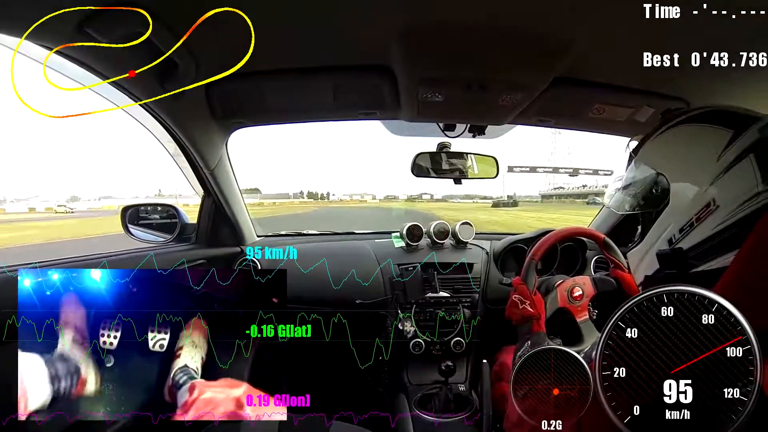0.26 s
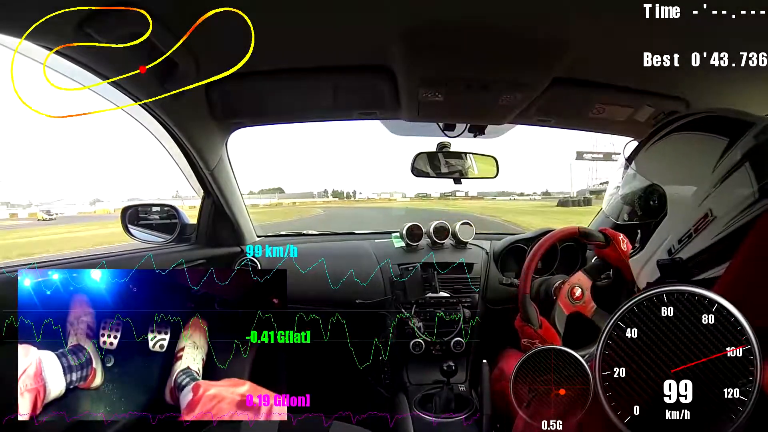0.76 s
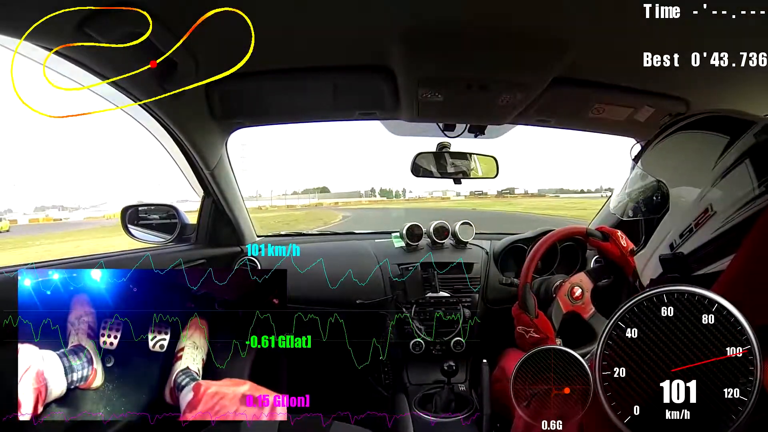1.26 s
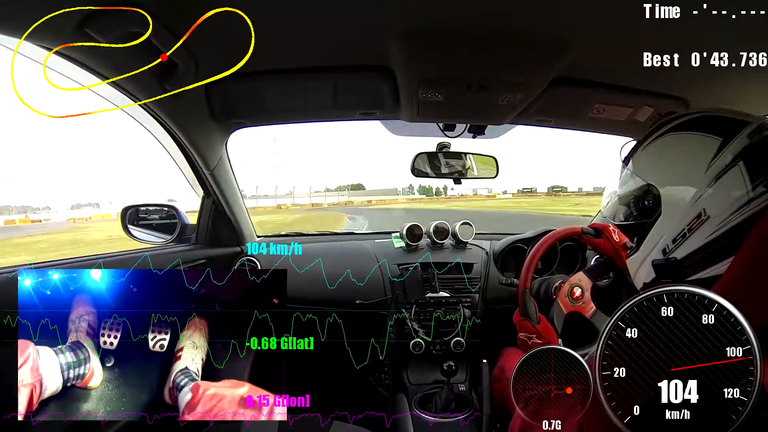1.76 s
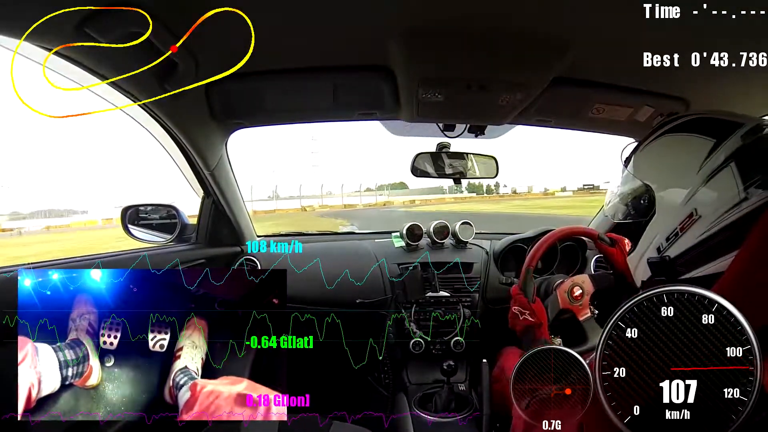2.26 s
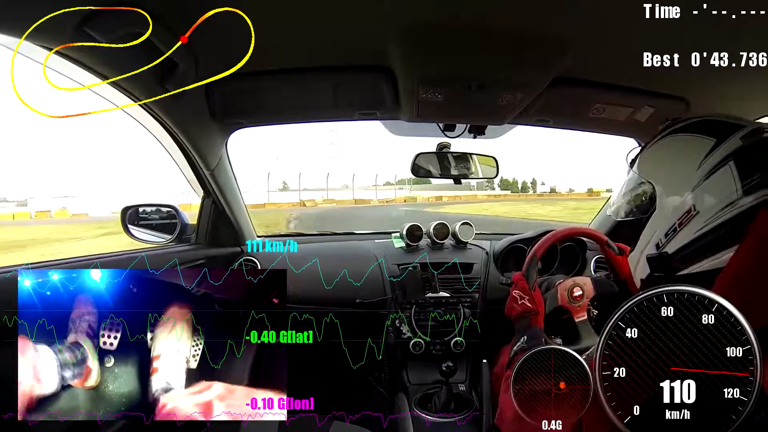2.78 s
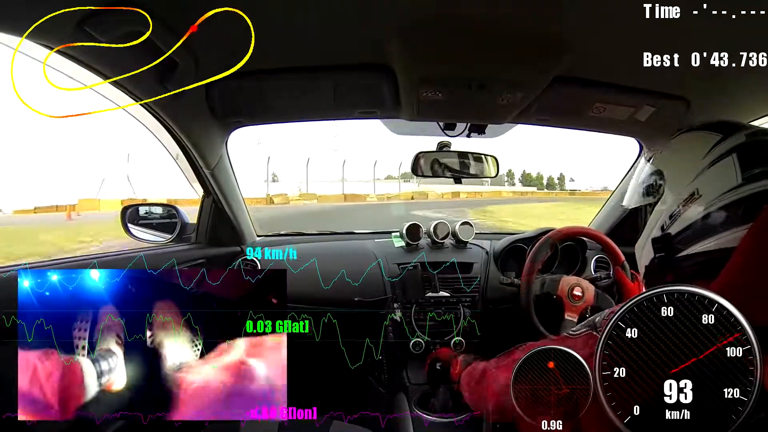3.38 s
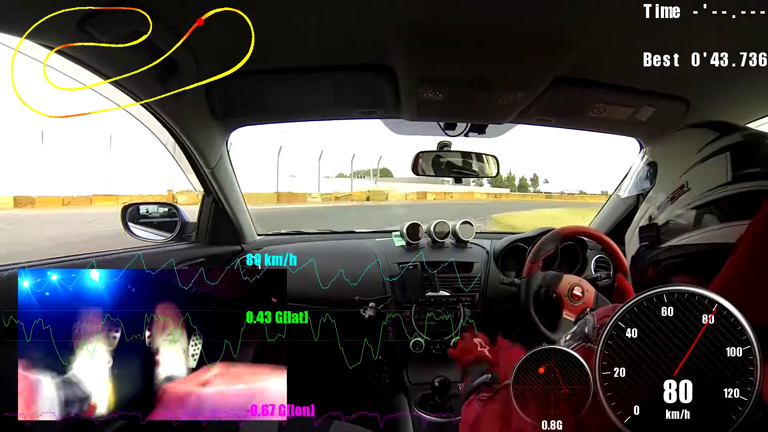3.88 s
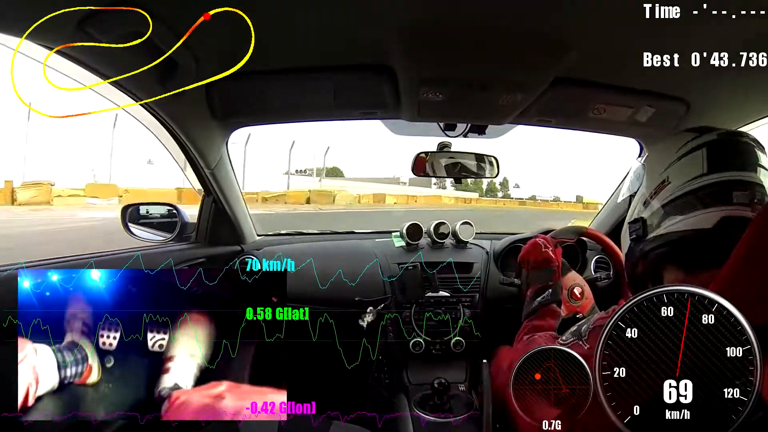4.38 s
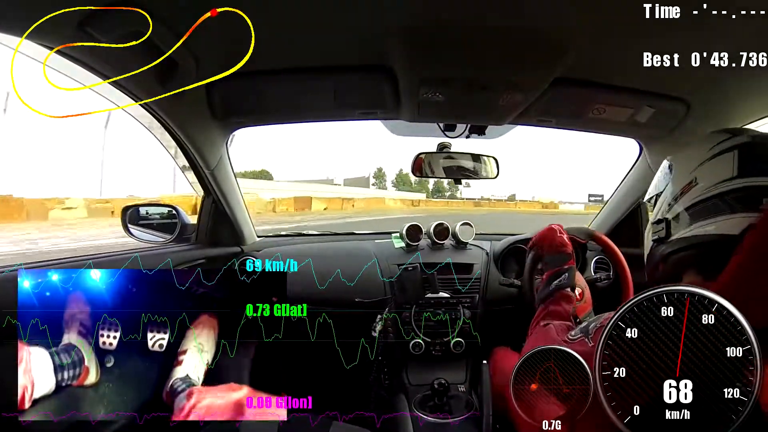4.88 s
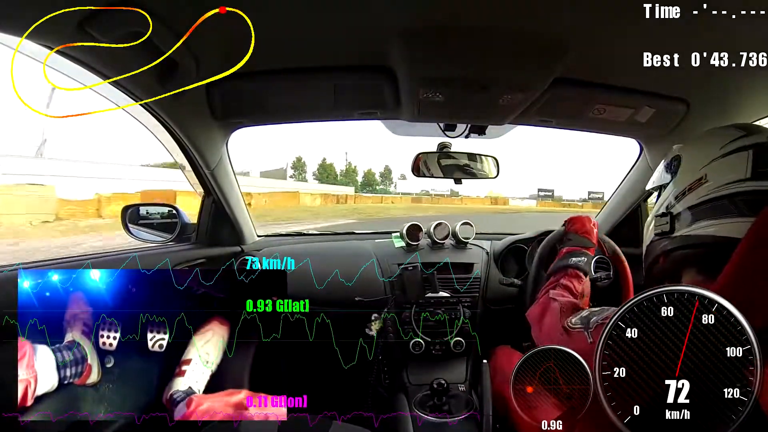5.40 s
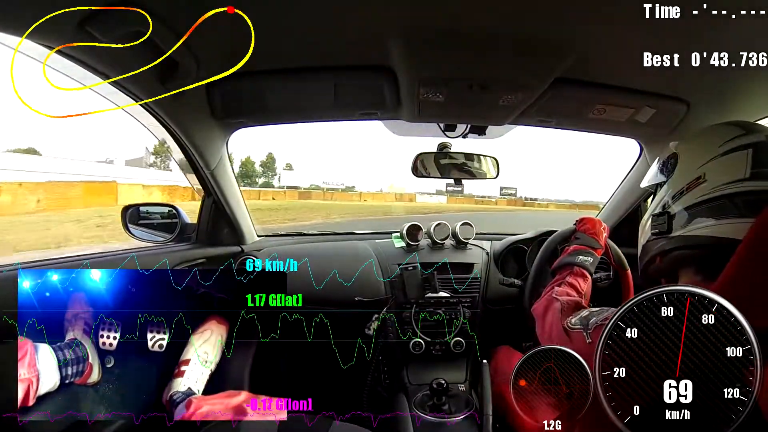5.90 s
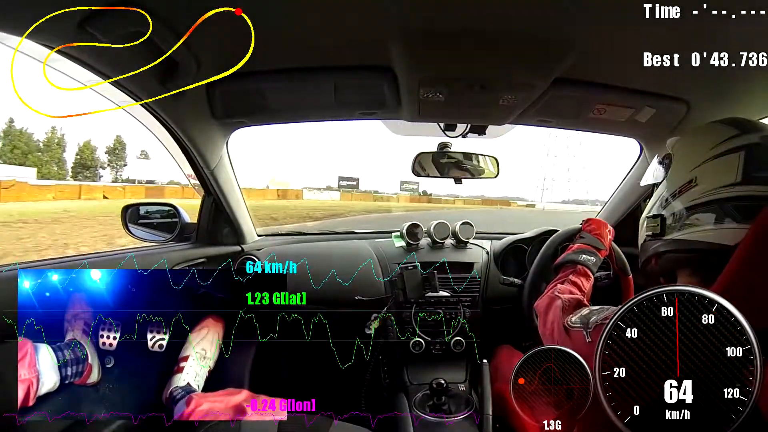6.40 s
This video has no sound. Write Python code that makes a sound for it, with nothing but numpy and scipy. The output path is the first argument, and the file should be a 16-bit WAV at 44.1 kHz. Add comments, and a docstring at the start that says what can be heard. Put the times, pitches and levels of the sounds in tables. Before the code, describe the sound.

Heard from inside a sports car on a race circuit, the engine drops in pitch on an upshift, then pulls with a slowly rising drone over deep road rumble and throbbing air. The throttle lifts, the tyres chirp under braking, and the engine blips for a downshift as the gear lever clacks with a thump. The tyres then squeal through a tight corner. The small microphone crackles faintly and distorts slightly.

```python
"""A rotary engine heard from inside a car on a circuit: an upshift, a pull, braking with a blipped
downshift, then a tight corner. The exhaust drones on its firing orders, the cabin air throbs like a
blown bottle, the road rumbles and roars, and the treble crackles. Tyres stick and slip into chirps and
squeals, and the gear lever jangles its gate. The small microphone saturates on the biggest swings."""
import sys
import numpy as np
from scipy import signal
from scipy.fft import rfft, irfft, next_fast_len
from scipy.io import wavfile
from scipy.ndimage import uniform_filter1d, map_coordinates

SR = 44100
rng = np.random.default_rng(int(sys.argv[2]) if len(sys.argv) > 2 else 0)


def transcribe(signal):
    """Save signal, clipped to [-1, 1], as a 16-bit WAV file at the path in sys.argv[1]."""
    frames = np.atleast_2d(signal).T
    limited = np.clip(frames, -1, 1)
    pcm = np.round(limited * 32767).astype(np.int16)
    wavfile.write(sys.argv[1], SR, pcm)


N = 293265
TIME_S = np.arange(N) / SR


def amp(db):
    return 10 ** (np.asarray(db) / 20)


def unit(x):
    return x / np.sqrt(np.mean(x ** 2) + 1e-20)


def along(points, hz):
    """Read an EQ curve at hz, on a log frequency axis."""
    freq_hz, gain_db = np.transpose(points)
    return np.interp(np.log(hz + 1), np.log(freq_hz + 1), gain_db)


def curves(rows):
    """One automation curve for each column after the time."""
    time_s, *columns = np.transpose(rows)
    return [np.interp(TIME_S, time_s, column) for column in columns]


def window(rows, fade_s=0.016):
    """A gate open while the table runs, fading except at the edges of the scene."""
    start = (TIME_S - rows[0][0]) / fade_s + (rows[0][0] <= 0)
    end = (rows[-1][0] - TIME_S) / fade_s + (rows[-1][0] > N / SR - .1)
    return np.clip(np.minimum(start, end), 0, 1)


def wobble(rate_hz, step=16):
    """Smooth random modulation."""
    at = np.arange(0, N + step, step)
    knots = rng.standard_normal(int(N * rate_hz / SR) + 4)
    return np.interp(np.arange(N), at, map_coordinates(knots, [at * rate_hz / SR]))


def filtered(x, response):
    size = next_fast_len(N + SR // 2)
    return irfft(rfft(x, size) * response(np.fft.rfftfreq(size, 1 / SR)), size)[..., :N]


def noise(colour):
    """Coloured noise of rms 1."""
    return unit(filtered(rng.standard_normal(N), lambda hz: amp(along(colour, hz))))


def turns(hz):
    """Running phase of a pitch curve, in radians."""
    return 2 * np.pi * np.cumsum(hz) / SR


def evened(x, share):
    """Even out the swings of a noise, as in damped or self-limiting motion."""
    envelope = np.abs(signal.hilbert(x, next_fast_len(N))[:N])
    return unit(x / (envelope + 0.38) ** share)


def strikes(rows):
    """One spike for each row of start_s, level_db."""
    start_s, level_db = np.transpose(rows)
    return np.bincount(np.round(start_s * SR).astype(int), amp(level_db), N)


def puffs(spikes, colour, t60_s, rise_s):
    """Each spike becomes a short puff of noise."""
    t = np.arange(SR // 20) / SR
    shape = amp(-60 * t / t60_s) * (1 - np.exp(-t / rise_s))
    envelope = signal.fftconvolve(spikes, shape)[:N]
    return filtered(envelope * rng.standard_normal(N), lambda hz: amp(along(colour, hz)))


# slow fader ride: time_s, gain_db
SWELLS = [(0, -1.5), (.3, -0.5), (.55, -3.5), (.7, 2.5), (1.3, 2.5), (1.36, -3.5), (1.6, -2), (1.78, -4.5),
          (1.9, 2.5), (2.14, 2), (2.2, -1), (2.5, -1.5), (2.72, 1), (3.1, 5), (3.55, 1), (3.78, 2.5),
          (4.0, -2), (4.2, -0.5), (4.6, -2), (5.0, 1), (5.35, 1), (5.7, 1.5), (6.0, -0.5), (6.65, 0)]
# sudden dips: start_s, depth_db (scaled by the dip's envelope)
DIPS = [(.3, -7.5), (2.26, -4), (2.549, -8.5), (3.12, -10), (3.204, -0.5), (3.236, -5), (3.27, -8),
        (3.409, -7), (4.01, 0), (4.231, -16)]


def bed_fader(fall_s=0.0062, recover_s=0.07):
    """Gain in dB shared by engine and road: slow swells and brief dips."""
    gain_db = curves(SWELLS)[0]
    for start_s, depth_db in DIPS:
        age = np.maximum(TIME_S - start_s, 0)
        gain_db += depth_db * (1 - np.exp(-age / fall_s)) * np.exp(-age / recover_s)
    return gain_db


# engine revs: time_s, firing_hz
REVS = [(0, 227), (.28, 164), (.45, 166), (.81, 170.4), (1.17, 174.4), (1.53, 177.5), (1.98, 181.8),
        (2.6, 187), (2.9, 188), (3.55, 122), (3.7, 157), (3.84, 192.5), (3.92, 193), (4.05, 188),
        (4.36, 164), (4.62, 173), (4.72, 183), (4.87, 172), (5.06, 181), (5.3, 180), (5.45, 173),
        (5.8, 165.5), (6.28, 154)]
# throttle: time_s, drone_db, overtone_bite_db
THROTTLE = [(0, -22.5, 3.5), (.09, -18.5, -13), (.3, -21.5, 6), (.7, -21, 3.5), (.93, -21.5, 1),
            (1.08, -22.5, -5.5), (1.27, -21, 1), (1.5, -20, 5), (2.0, -20, 2.5), (2.2, -19.5, 0.5),
            (2.3, -18, -4.5), (2.63, -20, -4), (2.68, -38.5, 7), (2.75, -29.5, -7), (2.82, -44.5, -7),
            (2.9, -50.5, 1), (3.55, -47, 1.5), (3.6, -29, 3.5), (3.72, -24.5, 7.5), (3.82, -16, -4.5),
            (3.925, -16, -1), (3.95, -35.5, 8.5), (4.0, -23, -7), (4.05, -51, 3), (4.36, -47, 3),
            (4.44, -23.5, 0), (4.6, -35.5, 3), (4.68, -13.5, -5.5), (4.76, -14, 1.5), (4.85, -21.5, 1.5),
            (4.95, -19.5, 0.5), (5.08, -16.5, 1), (5.26, -17, 2.5), (5.33, -32, 3.5), (5.42, -35.5, -7),
            (5.62, -27.5, 2.5), (6.1, -34, 6.5), (6.2, -24.5, 2), (6.28, -51, 1)]
# firing orders: firing_multiple, level_db, wander_db
ORDERS = [(.5, -16, 6.5), (1, 1.5, 0), (1.5, -30, 8), (2, -17.5, 0.5), (3, -19.5, 1), (4, -28, 2),
          (5, -32, 2)]
# resonances of exhaust and cabin: freq_hz, gain_db
PIPE_EQ = [(320, -1), (350, 3.5), (372, -0.5), (390, 9.5), (490, 2), (513, -5.5), (540, -2), (575, -3.5),
           (650, 1), (666, 7), (682, 12.5), (691, 12.5), (699, 5), (708, 3), (720, -2), (745, 6), (770, -6),
           (850, 3), (910, 2), (960, -3)]
# gas rasp: freq_hz, gain_db
RASP_EQ = [(250, -120), (350, -1), (500, 0.5), (700, 2), (950, -6.5), (1500, -16.5), (2500, -26),
           (4000, -120)]


def engine(fader_db, drift_rad=0.11, smear_rad=.05, rasp_db=-23):
    """Firing orders, uneven in size and timing, and a rasp of gas noise once per firing."""
    drone_db, bite_db = curves(THROTTLE)
    firing_hz = curves(REVS)[0]
    level_db = drone_db + fader_db
    phase = turns(firing_hz) + drift_rad * wobble(30)
    drone = np.zeros(N)
    for k, order_db, wander_db in ORDERS:
        tone_db = order_db + (k > 1) * bite_db + along(PIPE_EQ, k * firing_hz) + wander_db * wobble(7)
        smear = smear_rad * (k - 1) * wobble(70)
        drone += amp(level_db + tone_db) * np.sin(k * phase + smear + rng.uniform(0, 2 * np.pi))
    rasp = unit((1 + np.cos(phase)) ** 2 * noise(RASP_EQ))
    return np.sqrt(2) * drone + amp(level_db + rasp_db + bite_db / 2) * rasp


# road speed: time_s, speed_kmh
SPEED = [(0, 93), (2.75, 111), (3.0, 106), (3.75, 80), (4.5, 68), (5.5, 71), (6.65, 63)]
# sub-bass throb of the cabin air: time_s, level_db
THROB = [(0, -10.5), (.55, -10.5), (.9, -14.5), (1.13, -18.5), (1.3, -13), (1.39, -9.5), (1.75, -11),
         (1.83, -14), (2.0, -20), (2.2, -12.5), (2.43, -21), (2.85, -14.5), (3.3, -22), (3.7, -17.5),
         (3.95, -21), (4.18, -10.5), (4.3, -31.5), (4.62, -13), (4.78, -23), (4.98, -10), (5.12, -21),
         (5.9, -10.5), (6.1, -12.5), (6.5, -20.5), (6.65, -3.5)]
# its harmonics: pitch_multiple, level_db
THROB_HARMONICS = [(1, 0), (2, -19), (3, -19)]


def throb(hz_at_100_kmh=17.6, hz_per_kmh=0.075):
    """The cabin air bounces like a blown bottle, with an unsteady, peaked beat."""
    pitch_hz = hz_at_100_kmh + hz_per_kmh * (curves(SPEED)[0] - 100)
    phase = turns(pitch_hz) + 0.33 * wobble(2.926)
    beat = sum(amp(db + (k > 1) * 3.5 * wobble(7.2)) * np.cos(k * phase) for k, db in THROB_HARMONICS)
    return np.sqrt(2) * amp(curves(THROB)[0] + 2.05 * wobble(12)) * beat


# roughness under the wheels: time_s, rumble_db, boom_db, drumming_db
SURFACE = [(0, -17.5, -29.5, -31.5), (.45, -19.5, -28, -29.5), (.85, -27, -27, -31),
           (1.2, -16.5, -23.5, -30.5), (1.6, -17.5, -26.5, -28.5), (1.8, -23, -22.5, -29.5),
           (2.0, -20.5, -23, -30.5), (2.4, -15.5, -18, -31), (2.7, -17.5, -22, -32.5),
           (2.98, -19.5, -31.5, -32.5), (3.1, -13, -20.5, -32.5), (3.2, -16, -17.5, -31.5),
           (3.3, -16, -13.5, -26), (3.4, -11, -21.5, -32.5), (3.45, -21, -28, -31.5),
           (3.6, -22.5, -24, -28), (3.75, -17, -26.5, -29), (4.05, -19.5, -23.5, -28.5),
           (4.2, -13, -18.5, -28), (4.3, -13, -20, -30.5), (4.5, -17, -20.5, -27.5),
           (4.9, -19.5, -25, -28.5), (5.35, -22, -25.5, -30), (5.7, -16, -22.5, -27.5),
           (6.1, -20, -23.5, -29), (6.3, -14, -20.5, -28), (6.65, -16.5, -20.5, -24.5)]
# colours of the five road layers: freq_hz, gain_db
RUMBLE_EQ = [(13, -20), (22, 0.5), (31, -1), (65, -12.5), (84, -37), (140, -120)]
BOOM_EQ = [(32, -24), (55, 3), (70, -3.5), (91, 3.5), (150, -9), (200, -35.5), (330, -120)]
ROAR_EQ = [(300, -120), (500, -9), (682, 1.5), (780, -2), (870, -2.5), (1140, -7), (1660, -10),
           (2400, -17.5), (3090, -31), (4020, -37), (6800, -120)]
PANEL_EQ = [(70, -120), (120, -12), (150, 0), (280, -4.5), (375, -9), (520, -14), (640, -23.5),
            (1000, -120)]
WIND_EQ = [(1500, -30.5), (2500, -3), (3400, -4), (4700, -9.5), (6400, -12.5), (8000, -13.5), (9500, -20),
           (11200, -29), (12900, -39.5), (14400, -46.5), (16000, -120)]
# fader ride on wind and crackle: time_s, gain_db
TREBLE_RIDE = [(0, -0.5), (.55, -1.5), (.7, -0.5), (1.0, -2), (1.03, -3.5), (1.1, -2.5), (1.33, -1.5),
               (1.6, -0.5), (1.84, -1.5), (2.1, -1.5), (2.4, -0.5), (2.66, -0.5), (2.75, -1), (3.1, -1.5),
               (3.3, -0.5), (3.75, -0.5), (4.12, 2), (4.4, -0.5), (4.69, 0.5), (4.9, 1), (5.0, -1),
               (5.4, -1.5), (5.7, -2.5), (6.1, -3), (6.65, -2.5)]


def road(shake, fader_db):
    """Suspension rumble, floor boom, tyre roar, drumming panels, wind hiss and a fine crackle."""
    rumble_db, boom_db, drumming_db = curves(SURFACE)
    rumble = filtered(evened(noise(RUMBLE_EQ), share=.35), lambda hz: hz < 90)
    rumble *= amp(fader_db + rumble_db + 1.8 * wobble(14))
    boom = filtered(evened(noise(BOOM_EQ), share=.55), lambda hz: hz < 210)
    boom *= amp(fader_db + boom_db + 1.6 * wobble(16))
    power = (shake + rumble + boom) ** 2
    swing = power / np.abs(uniform_filter1d(power, size=SR // 4))  # against the local average

    unrest = amp(.45 * (curves(THROB)[0] + 13))  # the noise is smoother while the air throbs less
    flutter = unrest * 4 * np.tanh((wobble(22) + 2.0 * wobble(60)) / 3.2)
    lumps = unrest * wobble(12)
    speed_db = 20 * np.log10(curves(SPEED)[0] / 100)
    roar = amp(-38 + 0.17 * speed_db) * unit(amp(0.94 * flutter + 0.5 * lumps) * noise(ROAR_EQ))
    panels = amp(drumming_db) * unit(amp(0.31 * lumps + 0.23 * wobble(18)) * noise(PANEL_EQ))
    wind = unit(amp(0.86 * flutter + 0.21 * lumps + 0.17 * np.minimum(swing, 5.5)) * noise(WIND_EQ))
    treble_db = -55 + 1.26 * speed_db + curves(TREBLE_RIDE)[0]
    treble = amp(treble_db) * (wind + amp(-1.5) * crackle(swing))
    return rumble + boom + amp(fader_db) * (roar + panels + treble)


# colour of crackle, ticks and lever rasp: freq_hz, gain_db
TICK_EQ = [(700, -120), (1400, -3), (2500, 8), (4200, -3), (6500, -10), (8500, -17), (11000, -23),
           (14400, -50), (16000, -120)]


def crackle(swing):
    """Fine crackle that thickens on the biggest low swings."""
    rate_hz = 400 * np.minimum(swing, 2.0) ** 1.2
    spikes = (rng.random(N) < rate_hz / SR) * amp(rng.normal(0, 1.5, N))
    return unit(puffs(spikes, TICK_EQ, t60_s=0.014, rise_s=.006))


# thin high whistle: pitch_hz, level_db, end_s
WHISTLE = (7806, -68, .135)


def whistle(fade_s=0.016):
    """A faint steady tone that stops soon."""
    pitch_hz, level_db, end_s = WHISTLE
    gate = np.clip((end_s - TIME_S) / fade_s, 0, 1)
    return np.sqrt(2) * amp(level_db) * gate * np.sin(2 * np.pi * pitch_hz * TIME_S)


# the clearest short ticks: start_s, relative_db
TICKS = [(0.016, -34), (0.0234, -36), (0.0965, -36), (0.1131, -33), (0.142, -36), (0.173, -36),
         (0.199, -36), (0.282, -33), (0.411, -36), (5.2, -34), (5.221, -33), (5.3248, -35), (5.665, -35),
         (5.683, -37), (5.79, -35), (1.6, -35), (1.742, -36), (0.0483, -32), (0.0654, -30), (0.0754, -29),
         (0.082, -36.5), (0.1516, -29), (0.1574, -47), (0.2199, -34), (0.2514, -30), (0.2905, -28),
         (0.3, -35), (0.3424, -30), (0.3554, -45), (0.388, -30), (0.401, -46), (0.4624, -30.5),
         (0.518, -30), (0.5574, -37), (0.5824, -38), (1.0, -34.5), (1.255, -32), (1.3069, -27),
         (1.3723, -31), (1.468, -32), (1.5274, -31.5), (2.155, -28), (2.2453, -28), (2.4186, -28),
         (2.5407, -27), (2.5785, -30), (2.969, -38.5), (3.0041, -26), (3.056, -38), (3.458, -33),
         (3.713, -45), (3.7786, -36), (4.12, -41), (4.474, -34), (4.8494, -39), (5.0325, -30.5),
         (5.0712, -36), (5.395, -30), (5.63, -35), (5.5298, -34), (5.5895, -31), (5.7159, -30),
         (5.7678, -34), (5.8556, -35), (5.9564, -38), (6.05, -34), (6.077, -41), (6.12, -34), (6.1294, -37),
         (6.147, -40), (6.1594, -39), (6.257, -35), (6.3165, -34.5)]


def ticks():
    """Short ticks of noise stand out of the crackle."""
    return amp(2.0) * puffs(strikes(TICKS), TICK_EQ, t60_s=0.017, rise_s=0.0022)


# dry treble clicks: start_s, relative_db
SNAPS = [(0.0233, -36), (0.0497, -35), (0.08, -43), (0.1525, -39), (0.1579, -40), (0.3016, -43),
         (0.3722, -47), (0.3892, -39), (0.3933, -40), (0.4665, -44), (0.5062, -42), (0.52, -40),
         (0.5529, -40.5), (0.5595, -41), (0.5642, -38), (0.5842, -39), (0.6192, -42), (0.971, -37.5),
         (1.0024, -39), (1.3096, -37), (1.3352, -39), (1.3462, -44), (1.3669, -42), (1.3734, -38),
         (1.3821, -37.5), (1.4692, -39), (1.5604, -37), (1.5765, -36), (1.6122, -42), (1.6374, -41.5),
         (1.6714, -45), (1.6948, -42), (1.7448, -43), (1.7553, -44), (2.1629, -40), (2.2472, -47),
         (2.2969, -41), (2.3017, -44.5), (2.4205, -38), (2.5434, -38), (2.5983, -45), (2.692, -42),
         (2.9411, -37), (3.1052, -39), (3.2018, -40), (3.2597, -45), (3.2677, -42), (3.3129, -46),
         (3.4193, -46), (3.4418, -49), (3.4465, -46), (3.7667, -40.5), (3.8716, -40.5), (4.3649, -49),
         (4.4097, -51), (4.4751, -42), (4.4928, -49), (5.0345, -40), (5.0719, -39), (5.2517, -44),
         (5.3939, -43), (5.769, -39), (5.7791, -40), (5.8059, -40), (5.8581, -43.5), (5.8748, -41),
         (5.8853, -43), (5.8897, -41), (5.8954, -40), (5.9034, -44.5), (5.907, -47), (5.9342, -40),
         (5.9576, -39), (5.9674, -37), (5.9893, -40), (6.0208, -46), (6.0558, -46), (6.1237, -42),
         (6.1306, -39), (6.1476, -47), (6.1544, -45.5), (6.1615, -45)]
# their colour: freq_hz, gain_db
SNAP_EQ = [(800, -120), (1500, -9), (2400, 0.5), (3400, 0.5), (4500, -4), (6500, -10), (8600, -14),
           (10700, -20.5), (12700, -32), (14400, -42.5), (16000, -120)]


def snaps():
    """Sharp dry clicks of random polarity."""
    spikes = strikes(SNAPS) * rng.choice([-1, 1], N)
    return amp(18.5) * filtered(spikes, lambda hz: 1j * amp(along(SNAP_EQ, hz)))  # 1j: spike to edge


# metallic ticks: start_s, relative_db
JINGLES = [(2.94, -58), (2.994, -50), (3.004, -55), (3.0954, -50.5), (3.107, -57), (4.2253, -55),
           (4.8299, -55.5), (4.8544, -52)]
# their sheen: freq_hz, gain_db
JINGLE_EQ = [(3000, -120), (5000, -10), (7800, -11), (9000, -1), (9650, -1.5), (10500, -7.5), (12500, -18),
             (14400, -36.5), (16000, -120)]


def jingles():
    """Bright, metallic-sounding puffs of noise."""
    return amp(11) * puffs(strikes(JINGLES), JINGLE_EQ, t60_s=0.04, rise_s=.002)


def tread_tone(pitch_hz, width_hz, core):
    """A tone of rms 1: a steady core, blurred by scrub."""
    phase = turns(pitch_hz + 5 * wobble(25))
    tone = (wobble(width_hz) + core) * np.sin(phase) + wobble(width_hz) * np.cos(phase)
    return evened(unit(tone), share=0.42)


# one wheel skids briefly: time_s, level_db
SKID = [(3.13, -48.5), (3.15, -36), (3.18, -31), (3.2, -33), (3.23, -59.5)]
# its colour: freq_hz, gain_db
SKID_EQ = [(300, -120), (500, -23), (850, 6.5), (1200, -19.5), (1600, 4), (1900, -8), (2400, -10),
           (3200, -29.5), (5000, -120)]
# braking chirps, then a table for each of two slides: time_s, pitch_hz, tread_db, carcass_db
BRAKE_CHIRPS = [(2.97, 713.3, -44, -42), (2.978, 689, -37, -40), (2.99, 670, -39, -42),
                (2.996, 668, -49, -39), (3.006, 655, -25, -39), (3.018, 666, -23.5, -43),
                (3.038, 706, -29, -44), (3.044, 684, -39, -42), (3.062, 653, -34, -48),
                (3.092, 651, -25, -48), (3.124, 641, -35, -51), (3.15, 624, -38, -37),
                (3.186, 672, -27, -26.5), (3.204, 640, -32, -41), (3.216, 626, -28, -42),
                (3.244, 630, -49, -48), (3.262, 645, -53, -43), (3.27, 643, -45, -42)]
SLIDES = [
    [(3.65, 665, -49, -47), (3.71, 669, -37, -47), (3.9, 676.6, -41.5, -52), (3.96, 690, -37, -55),
     (4.04, 690, -42, -40.5), (4.17, 681, -39.5, -43.5), (4.25, 698, -59, -55)],
    [(5.35, 686, -44, -41), (5.48, 670, -33.5, -39), (5.54, 682, -34, -37), (5.57, 669, -30.5, -38.5),
     (5.63, 670, -30.5, -35), (5.75, 674, -29.5, -33.5), (5.78, 676.4, -38, -37.5), (5.82, 665, -28, -36.5),
     (5.93, 684, -35.5, -39.5), (6.0, 675.5, -27, -34.5), (6.06, 695.2, -29, -37),
     (6.12, 705, -27.5, -33.5), (6.15, 714.6, -31, -32.5), (6.19, 701.3, -46, -31), (6.26, 689, -33.5, -35),
     (6.33, 715, -36, -36.5), (6.38, 700, -32, -36), (6.42, 700.5, -30.5, -33), (6.5, 697, -32, -34.5),
     (6.55, 690, -33, -37), (6.63, 700, -31, -31.5)],
]
# blur of the chirps and of each slide: width_hz
TREAD_WIDTHS = [110, 90, 115]
# carcass resonances: centre_hz, width_hz, gain_db
CARCASS_MODES = [(817, 200, 2), (1216, 120, -8), (1534, 25, -4.5)]
# lower and upper tones that join in the corner: time_s, pitch_hz, level_db
LOW_SQUEAL = [(6.18, 622, -38), (6.25, 627.7, -33.5), (6.33, 621, -33.5), (6.39, 616.5, -45),
              (6.45, 630, -28.5), (6.5, 618.5, -27.5), (6.55, 598, -36), (6.6, 622, -29), (6.65, 607, -33)]
HIGH_SQUEAL = [(5.55, 1200, -54), (5.7, 1208, -43), (5.8, 1220, -53), (6.0, 1270, -55), (6.07, 1276, -47),
               (6.13, 1210, -44), (6.22, 1225, -37.5), (6.26, 1240, -44), (6.34, 1212, -37.5),
               (6.41, 1230, -41), (6.46, 1225, -43), (6.52, 1220, -36.5), (6.65, 1238, -41)]
# texture of those two: width_hz, core_strength
SIDE_TEXTURES = [(150, .6), (95, .3)]


def tyres():
    """Tread blocks stick and slip: fuzzy wandering tones, a ringing carcass, one short skid."""
    def carcass(hz):
        return sum(amp(db) * width ** 2 / ((hz - centre) ** 2 + width ** 2)
                   for centre, width, db in CARCASS_MODES)

    out = amp(curves(SKID)[0]) * noise(SKID_EQ)
    for rows, width_hz in zip([BRAKE_CHIRPS, *SLIDES], TREAD_WIDTHS):
        pitch_hz, tread_db, carcass_db = curves(rows)
        ring = unit(filtered(rng.standard_normal(N), carcass))
        squeal = amp(tread_db + 1.2 * wobble(60)) * tread_tone(pitch_hz, width_hz, core=.85)
        out += window(rows) * (squeal + amp(carcass_db) * ring)
    for rows, (width_hz, core) in zip([LOW_SQUEAL, HIGH_SQUEAL], SIDE_TEXTURES):
        pitch_hz, level_db = curves(rows)
        out += window(rows) * amp(level_db + 1.3 * wobble(60)) * tread_tone(pitch_hz, width_hz, core)
    return out


# gear lever contacts: start_s, relative_db, tilt_db_per_octave
LEVER_HITS = [(3.9778, -19, -9), (4.224, -30, 2), (4.2448, -28.5, -1), (4.262, -25.5, -1.5),
              (4.272, -31, -5), (4.281, -28, -2)]
# ring of the gate: pitch_hz, level_db, t60_s
GATE_MODES = [(1670, -4.5, .05), (1870, 0.5, .13), (2000, 1, .05), (2340, -2, .025), (2480, -1, .025),
              (2850, -1, .03), (3520, -5.5, .025), (4330, -5, .02), (5170, -8, .02), (6730, -14, .02)]


def gear_lever(attack_s=0.00063):
    """Each contact jangles the loose gate: a rasp, and its modes ringing unevenly at new strengths."""
    out = np.zeros(N + SR)
    t = np.arange(SR // 8) / SR
    for start_s, hit_db, tilt_db in LEVER_HITS:
        ring = np.zeros(len(t))
        for hz, mode_db, t60_s in GATE_MODES:
            struck_db = mode_db + tilt_db * np.log2(hz / GATE_MODES[0][0]) + rng.normal(0, 2.6)
            jangle = 1 + .9 * map_coordinates(rng.standard_normal(130), [t * 900])
            ring += amp(struck_db - 60 * t / t60_s) * jangle * np.sin(2 * np.pi * hz * t)
        out[round(start_s * SR):][:len(t)] += amp(hit_db - 17.5) * ring * (1 - np.exp(-t / attack_s))
    contacts = strikes([(start_s, hit_db + tilt_db) for start_s, hit_db, tilt_db in LEVER_HITS])
    return out[:N] + amp(-7.5) * puffs(contacts, TICK_EQ, t60_s=0.041, rise_s=0.0016)


# tiny squeaks: start_s, pitch_hz, peak_db, length_s
SQUEAKS = [(4.112, 5450, -48, .004), (4.114, 8500, -58, .012), (4.1475, 8730, -55, .012),
           (4.152, 7800, -62, .012), (4.158, 5300, -46, .004), (4.405, 8720, -61, .012),
           (5.0705, 5100, -38, .0025), (6.162, 8300, -66, .012), (6.262, 7760, -63, .012),
           (6.3205, 8680, -61, .012), (6.35, 8750, -63, .012)]


def squeaks(pitch_rise=.015):
    """Short thin tones that bend up a little."""
    out = np.zeros(N)
    for start_s, pitch_hz, peak_db, length_s in SQUEAKS:
        progress = np.arange(round(length_s * SR)) / (length_s * SR)
        tone = np.sin(turns(pitch_hz * (1 + pitch_rise * progress)))
        out[round(start_s * SR):][:len(tone)] += amp(peak_db) * np.sin(np.pi * progress) * tone
    return out


# thump through the floor: centre_s, push_db, width_s
JOLTS = [(4.2256, -1.5, 0.0025)]


def floor_jolt():
    """A single push of air, then a shallow rebound."""
    out = np.zeros(N)
    for centre_s, push_db, width_s in JOLTS:
        offset = (TIME_S - centre_s) / width_s
        push = np.exp(-offset ** 2)
        rebound = 0.5 * np.exp(-((offset - 2.0) / 7.8) ** 2)
        out += amp(push_db) * (push - rebound)
    return out


def scene():
    """The mono mix; swings of engine and throb also thicken the crackle and ruffle the hiss."""
    fader_db = bed_fader()
    shake = engine(fader_db) + throb()
    bed = shake + road(shake, fader_db)
    spots = whistle() + ticks() + snaps() + jingles() + tyres() + gear_lever() + squeaks()
    return (bed + spots + floor_jolt())[None]


def record(dry, ceiling=.97, knee=4.5, fade_in_s=.004, top_hz=14400):
    """The capsule rounds off big swings; a short fade-in and a steep high cut follow."""
    saturated = dry / (1 + np.abs(dry / ceiling) ** knee) ** (1 / knee)
    return filtered(saturated * np.minimum(TIME_S / fade_in_s, 1), lambda hz: hz < top_hz)


dry = scene()
out = record(dry)
transcribe(out)
```